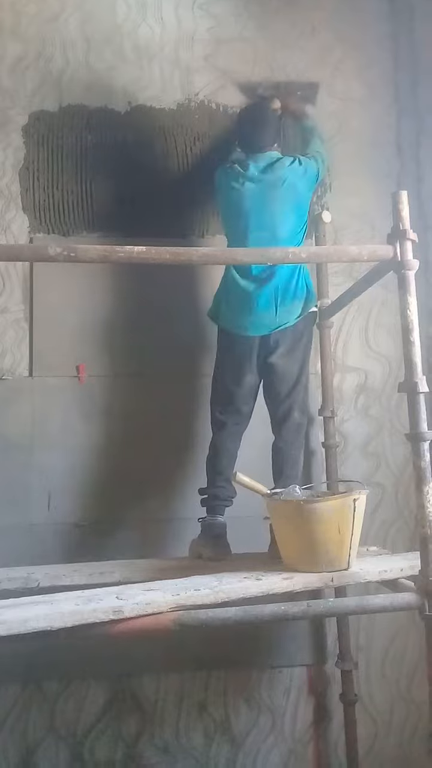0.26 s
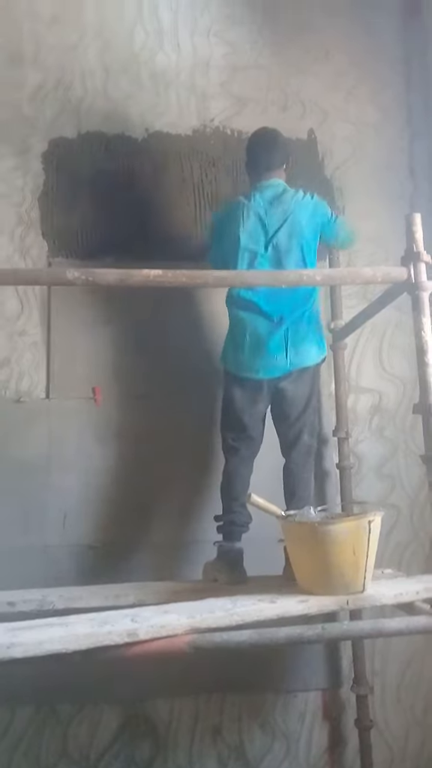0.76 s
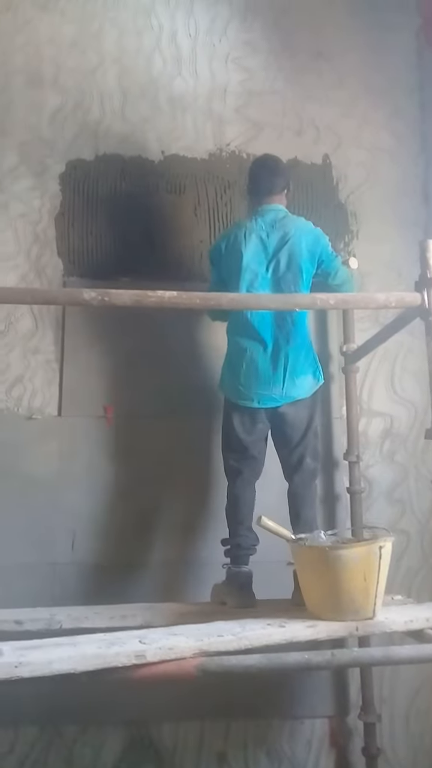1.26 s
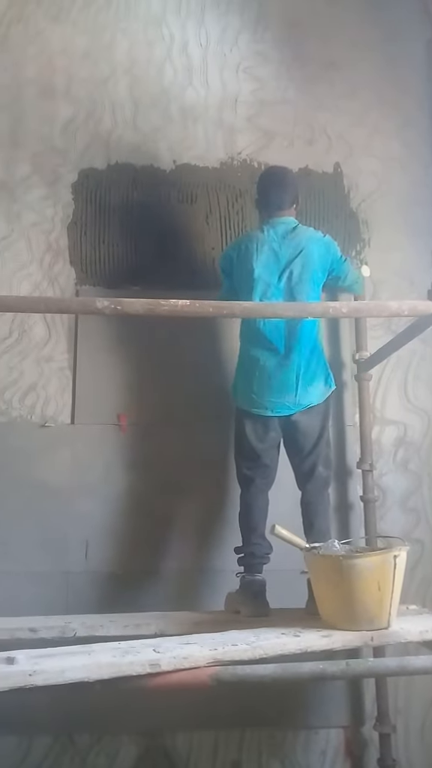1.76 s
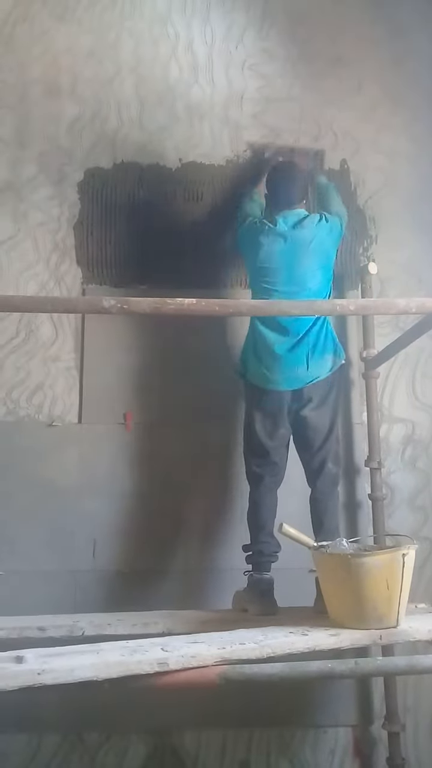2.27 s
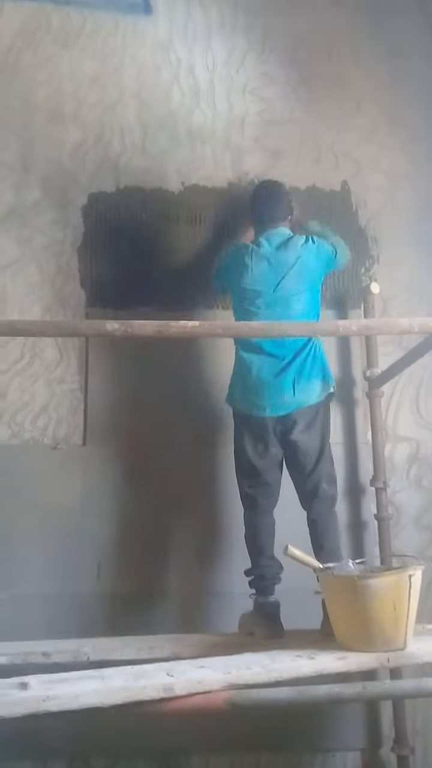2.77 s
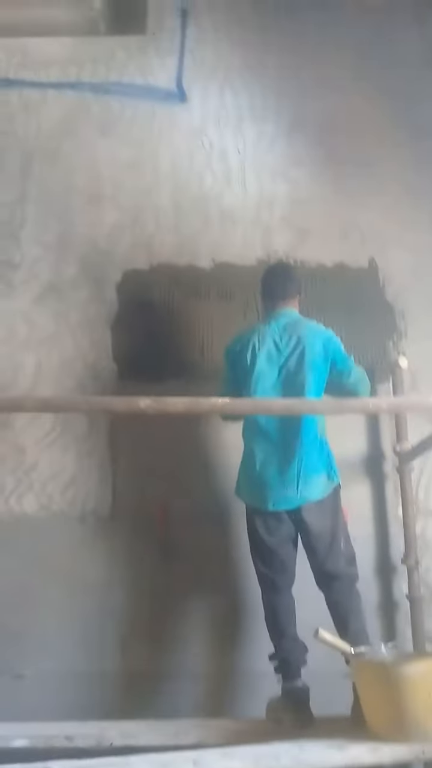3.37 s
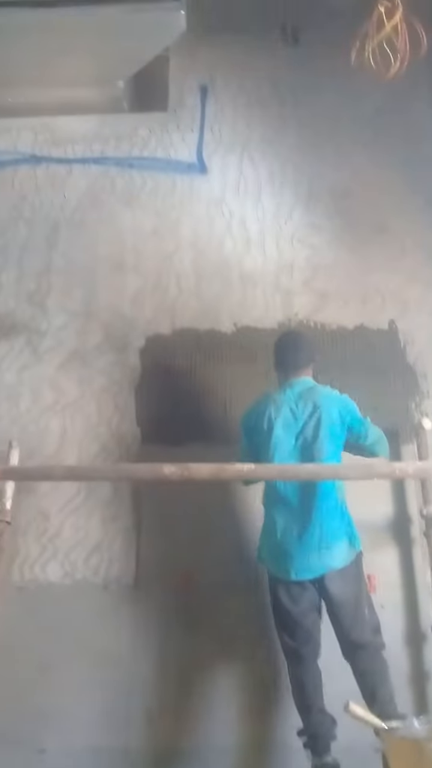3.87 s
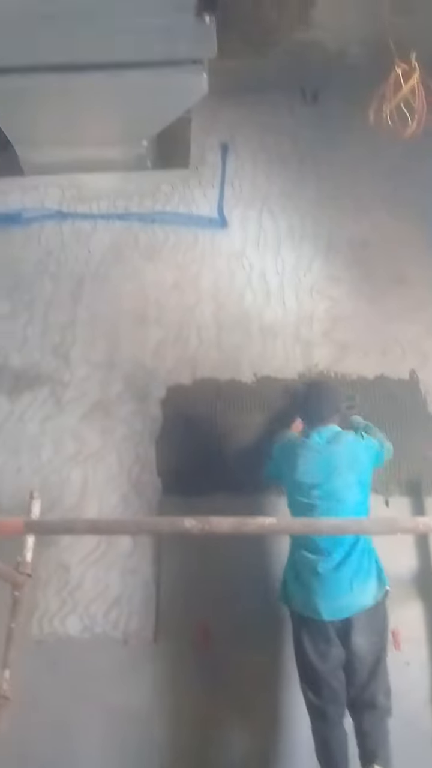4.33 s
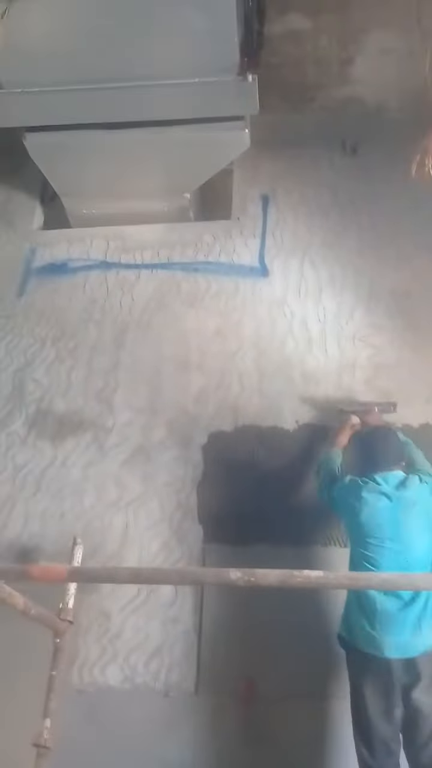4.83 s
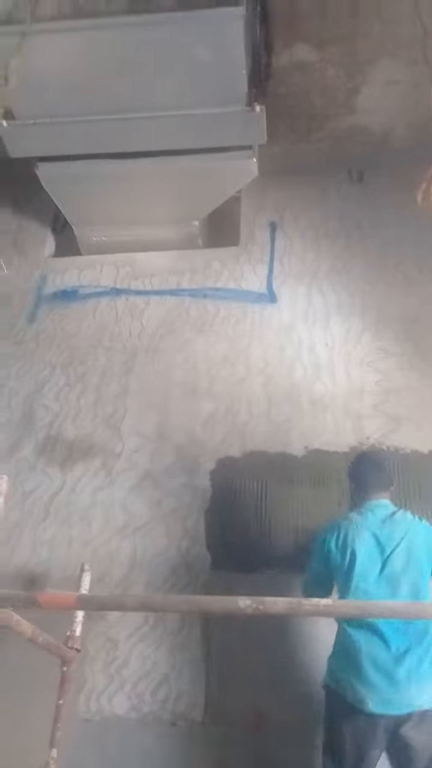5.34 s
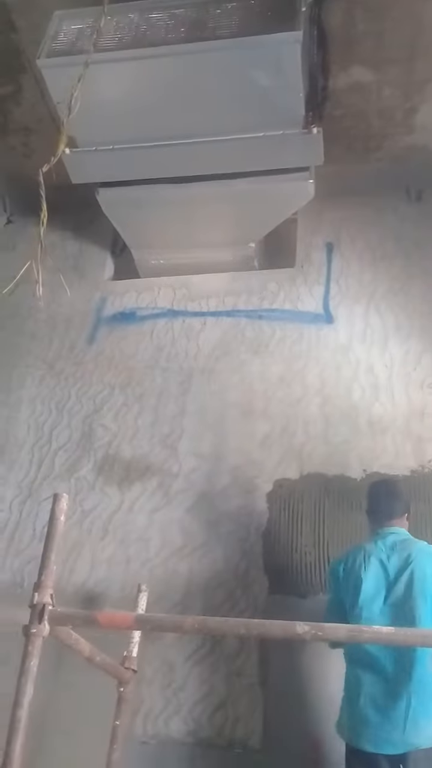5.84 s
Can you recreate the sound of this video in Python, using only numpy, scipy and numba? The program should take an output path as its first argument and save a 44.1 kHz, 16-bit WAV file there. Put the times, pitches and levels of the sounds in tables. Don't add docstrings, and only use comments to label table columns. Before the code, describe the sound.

A building site inside a bare concrete hall, heard by a phone some metres from the wall. A gritty steel scrape is already under way at the start, and stops by about 0.3 s, leaving a diffuse echo over faint motor hum, low rumble and blurred far-off machinery. At 1.45 s the blade cracks onto the wall with a short rub; from 1.65 to 2.4 s it makes a long rasping pull, sand hissing brightly over a ringing, hollow metal body. The echo fades. Around 3.7 s comes a soft dull thud with a faint rub, then an uneven, juddering pull from about 3.95 to 4.7 s, strongest near 4.1. Afterwards, distant work swells; close to the phone are a faint tick at 5.15, a sharp click at 5.4, a slight rustle and thin squeak. A light broad rub and low board shake end it near 6 s.

```python
import sys
import numpy as np
from scipy import signal
from scipy.fft import rfft, irfft
from scipy.io import wavfile
from scipy.ndimage import uniform_filter1d
from numba import njit

SR = 44100
rng = np.random.default_rng(int(sys.argv[2]) if len(sys.argv) > 2 else 0)


def wrap_up_sound(samples):
    columns = np.atleast_2d(samples).T
    tamed = np.clip(columns, -1, 1)
    steps = np.round(tamed * 32767).astype(np.int16)
    wavfile.write(sys.argv[1], SR, steps)


def volts_from_decibels(level):
    exponent = np.asarray(level, float) / 20
    return 10 ** exponent


N = 269010


def unit(x):
    return x / np.sqrt(np.mean(x ** 2))


def on_log(table, hz):
    f, v = np.transpose(table)
    return np.interp(np.log(np.maximum(hz, 1)), np.log(f), v)


def colour(x, table):
    grid_hz = np.arange(2049) * SR / 4096
    cepstrum = irfft(np.log(volts_from_decibels(on_log(table, grid_hz))))
    cepstrum[1:2048] *= 2
    cepstrum[2049:] = 0
    impulse = irfft(np.exp(rfft(cepstrum)))
    return signal.fftconvolve(x, impulse)[:len(x)]


@njit
def svf(x, hz, width):
    y, b, l = np.empty(len(x)), 0., 0.
    for i in range(len(x)):
        g, k = np.tan(np.pi * hz[i] / SR), width / hz[i]
        v = (b + g * (x[i] - l)) / (1 + g * (g + k))
        b, l, y[i] = 2 * v - b, l + 2 * g * v, k * v
    return y


def band(x, hz, width):
    return unit(svf(x, hz + np.zeros(len(x)), 1. * width))


def walk(rate, size):
    k = int(SR / rate)
    steps = np.repeat(rng.standard_normal(size // k + 1), k)
    return 1.27 * uniform_filter1d(uniform_filter1d(steps, k), k)[:size]


def fade(t, s, db):
    return volts_from_decibels(np.interp(t, s, db, left=-200, right=-200))


def spells(t, rows):
    gain = 0
    for s, rise, hold, release, db in rows:
        corners = np.cumsum([s, rise, hold, release])
        gain = gain + fade(t, corners, db - 30 * np.array([1, 0, 0, 1]))
    return gain


def grains(size, per_s, spread_db):
    chance = rng.random((3, size))
    slipping = chance[0] < per_s / SR
    direction = np.sign(chance[1] - .5)
    bulk = np.minimum(-np.log(1 - chance[2]), 4)
    return unit(slipping * direction * volts_from_decibels(spread_db * bulk))


def trowel(t):
    # (time [s], level [dB])
    strokes = [
        [(0, -41.5), (0.06, -40), (0.12, -40), (0.19, -36), (0.24, -49), (0.27, -54.5), (0.31, -65)],
        [(1.632, -61), (1.71, -43.5), (1.8, -36.5), (1.93, -33.5), (2.07, -36), (2.14, -42), (2.28, -38),
         (2.35, -37.5), (2.44, -68.5)],
        [(3.82, -69.5), (3.94, -53.5), (4.07, -35.5), (4.31, -45.5), (4.41, -38), (4.48, -41), (4.53, -50),
         (4.6, -41), (4.74, -62)],
    ]
    # (blade over grit [dB], bending resonance [dB], its pitch [Hz],
    # slack mode over grit at start [dB], at end [dB])
    grips = [
        (12, -7.5, 860, 1.5, 24),
        (12.5, -7.5, 940, 1.5, 2.5),
        (13, -9.5, 940, 4, -5.5),
    ]
    # (frequency [Hz], level per Hz [dB])
    grit_colour = [(1650, -21), (2800, -0.5), (3210, -4), (4830, -5.5), (6300, -9), (7220, -15.5),
                   (8950, -17.5), (10800, -17), (14100, -25), (15600, -24.5)]
    # (frequency [Hz], level per Hz [dB])
    blade_colour = [(320, -44), (550, -12), (626, -23.5), (763, 3), (896, 0), (1100, 0), (1290, 0.5),
                    (1740, 1), (2090, 2), (3400, -26.5), (4420, -32.5), (7480, -120)]
    # (frequency [Hz], level per Hz [dB])
    wall_colour = [(53, -58), (90, -35), (248, -3), (387, 0.5), (456, 0.5), (626, -9), (700, -0.5),
                   (910, -12.5), (1540, -120)]
    # (frequency [Hz], width [Hz], level [dB])
    rings = [(940, 52, -17), (1390, 160, -19), (1480, 41, -8), (1664, 40, -29.5), (1840, 43, -31),
             (2073, 22, -9), (2567, 180, 3.5), (2785, 93, -8)]
    size = len(t)

    slips = grains(size, per_s=9000, spread_db=1.5) * volts_from_decibels(2.0 * walk(35, size))
    judder = grains(size, per_s=1500, spread_db=3.5) * volts_from_decibels(2.8 * walk(60, size))
    push = slips + 0.85 * judder

    ends = [row[0] for stroke in strokes for row in (stroke[0], stroke[-1])]
    blade_db, bend_db, bend_hz = (np.interp(t, ends, np.repeat(c, 2)) for c in np.transpose(grips)[:3])
    slack_db = np.interp(t, ends, np.array(grips)[:, 3:].ravel())

    light_db = np.interp(t, *np.concatenate(strokes).T) + 40
    wobble_db = 0.3
    wobble = [walk(14, size) for _ in range(4)]
    blade_db = blade_db - 0.15 * light_db + wobble_db * wobble[0]
    wall_db = -4.5 - 0.2 * light_db + wobble_db * wobble[1]
    slack_db = slack_db + wobble_db * wobble[2]
    bend_hz = bend_hz * (1 + 0.036 * wobble[3])

    ringing = 0
    for hz, width, db in rings:
        ringing = ringing + volts_from_decibels(db) * band(push, hz * (1 + 0.023 * walk(6, size)), width)
    bending = volts_from_decibels(bend_db) * band(push, bend_hz, 130)
    blade = unit(unit(colour(push, blade_colour)) + bending + volts_from_decibels(-15.5) * ringing)
    wall = unit(colour(judder, wall_colour))
    slack = band(band(push, 720, 240), 720, 240)
    hiss = unit(colour(slips, grit_colour))

    body = volts_from_decibels(blade_db) * blade + volts_from_decibels(wall_db) * wall + volts_from_decibels(slack_db - 9.0) * slack
    effort = sum(fade(np.maximum(t, 0), *np.transpose(stroke)) for stroke in strokes)
    return effort * (volts_from_decibels(4.0) * hiss + body)


def touches(t):
    # (time [s], peak level [dB], t60 [s])
    cracks = [
        (1.46, -16, .05),
        (1.647, -22.5, 0.26),
    ]
    # (start [s], rise [s], hold [s], release [s], level [dB])
    presses = [
        (1.454, 0.019, 0.025, 0.18, -36.5),
        (3.704, 0.024, 0.074, .3, -54.5),
        (5.693, .3, .04, 0.23, -39),
    ]
    # (start [s], rise [s], hold [s], release [s], level [dB])
    hisses = [
        (1.442, 0.022, .02, 0.22, -52.5),
        (3.594, 0.26, .03, 0.039, -54.5),
        (5.654, 0.19, 0.21, .3, -55.5),
    ]
    # (frequency [Hz], level per Hz [dB])
    body_colours = [
        [(180, -49), (300, -18.5), (418, -7), (453, -17), (593, -11), (637, -13), (733, -9), (1450, -3.5),
         (3300, -20.5), (4290, -54.5), (7260, -120)],
        [(120, -27), (200, 7), (236, 4.5), (493, -16), (952, -21), (1310, -32), (1970, -10), (3300, -31),
         (4290, -64), (7260, -120)],
        [(59, -38), (100, -4), (185, -9), (290, -10), (369, -1.5), (587, -6.5), (671, -8.5), (2200, -12.5),
         (3200, -20.5), (4680, -25), (7920, -120)],
    ]
    # (frequency [Hz], level per Hz [dB])
    hiss_colours = [
        [(1940, -33.5), (3300, 1), (3710, -1), (5730, 4), (8510, -14), (10700, -4), (12600, -10), (15600, -24)],
        [(1940, -39), (3300, -9), (4870, -2), (6730, -8), (8960, -19), (12000, -19), (15600, -50),
         (22000, -120)],
        [(1940, -34), (3300, -11), (4390, -3), (5230, 0.5), (7050, -7.5), (8190, -12.5), (11000, -14.5),
         (12900, -21), (15600, -33.5)],
    ]
    # (start [s], rise [s], hold [s], release [s], level [dB])
    thud = [
        (3.702, .008, .045, .08, -42),
    ]

    crack_gain = np.zeros(len(t))
    for s, db, t60 in cracks:
        crack_gain += (t >= s + .002) * volts_from_decibels(db - 8.0 - 60 * np.maximum(t - s, 0) / t60)
    noise = rng.standard_normal(len(t))
    edge = band(band(noise, 5500, 2500), 4800, 2500)
    out = crack_gain * (unit(colour(noise, body_colours[0])) + volts_from_decibels(-19.5) * edge)

    rub = grains(len(t), per_s=5400, spread_db=4.0) * volts_from_decibels(1.4 * walk(50, len(t)))
    teeth = rub[::-1]
    for press, hiss, body_colour, hiss_colour in zip(presses, hisses, body_colours, hiss_colours):
        out += spells(t, [press]) * unit(colour(rub, body_colour))
        out += spells(t, [hiss]) * unit(colour(teeth, hiss_colour))
    return out + spells(t, thud) * band(band(rub, 410, 350), 410, 350)


def tail():
    # (frequency [Hz], t60 [s])
    decay_times = [(200, 1.6), (500, 1.16), (1000, 1.195), (2200, 0.9), (4500, 0.77), (6400, 0.62),
                   (9000, 0.44), (12000, .33), (15500, 0.31)]
    delay_s = 0.0078
    age, out = np.arange(2 * SR) / SR, 0
    noise = rfft(rng.standard_normal(2 * SR))
    step = 2 * np.log2(np.maximum(np.arange(SR + 1) / 2, 1) / 70)
    for k in range(17):
        t60 = on_log(decay_times, 70 * 2 ** (k / 2))
        strip = irfft(noise * np.maximum(1 - abs(step - k), 0))
        out = out + strip * volts_from_decibels(-60 * age / t60) / np.sqrt(t60)
    out = out * np.minimum(age / delay_s, 1) ** 2
    return out / np.sqrt(np.sum(out ** 2))


def hall(x):
    turn = 2 * np.pi * 11 * np.arange(len(x)) / SR
    shares = np.cos(turn) * np.cos(0.366 * turn), np.sin(turn) * np.cos(0.3763 * turn), np.sin(0.3708 * turn)
    echoes = sum(signal.fftconvolve(x * share, tail())[:len(x)] for share in shares)
    return x + volts_from_decibels(2.5) * echoes


def nearby(t):
    # (time [s], peak level [dB], centre [Hz], width [Hz], t60 [s])
    ticks = [
        (5.16, -68, 7760, 3500, .03),
        (5.384, -52, 12370, 8000, 0.015),
        (5.39, -61, 12600, 13030, 0.38),
    ]
    # (start [s], rise [s], hold [s], release [s], level [dB])
    rustle = [
        (5.238, 0.061, 0.053, 0.84, -65),
    ]
    # (start [s], rise [s], hold [s], release [s], level [dB])
    low_rubs = [
        (5.24, .16, .02, .5, -61),
        (5.62, 0.14, 0.069, .1, -61.5),
    ]
    # (start [s], rise [s], hold [s], release [s], level [dB])
    squeak = [
        (5.3, .11, .04, .2, -70),
    ]

    out = 0
    for s, db, hz, width, t60 in ticks:
        crack = band(band(rng.standard_normal(N), hz, width), hz, width)
        out = out + (t >= s) * volts_from_decibels(db - 60 * np.maximum(t - s, 0) / t60) * crack
    rub = grains(N, per_s=7200, spread_db=-3.0)
    out = out + spells(t, rustle) * band(band(band(rub, 4800, 3000), 4300, 2700), 5500, 2600)
    out = out + spells(t, low_rubs) * band(band(rub, 2030, 600), 2030, 600)
    return out + spells(t, squeak) * band(rub, 3940 * (1 + .015 * walk(30, N)), 170)


def swell(t, db, rows):
    return np.hypot(volts_from_decibels(db), spells(t, rows))


def motor(t):
    # (start [s], rise [s], hold [s], release [s], level [dB])
    loads = [
        (.3, .5, 0.54, .6, -58.5),
        (3.6, 0.34, .05, .4, -59),
        (4.5, 0.49, .6, .6, -64),
    ]
    hum = band(np.sin(2 * np.pi * 86.1 * t) + 12 * rng.standard_normal(N), 86.1, 12)
    return hum * swell(t, -64.5, loads)


def rumble(t):
    # (frequency [Hz], level per Hz [dB])
    rumble_colour = [(15, -48), (25, 4.5), (76, -11), (134, -0.5), (170, -4), (244, -5), (330, -17.5),
                     (557, -13), (900, -22), (1170, -50.5), (1980, -120)]
    # (start [s], rise [s], hold [s], release [s], level [dB])
    boards = [
        (-.5, 0.34, .4, .6, -58),
        (1.012, .5, 1.0, 0.7, -52.5),
        (3.594, 0.32, 0.75, .6, -50.5),
        (5.749, 0.35, .01, .15, -44),
    ]
    low = unit(colour(rng.standard_normal(N), rumble_colour)) * volts_from_decibels(-1.5 + 0.41 * walk(6, N))
    return low * swell(t, -55, boards)


def far_work(t):
    # (frequency [Hz], level per Hz [dB])
    machine_colour = [(180, -32), (300, -2.5), (327, -3.5), (518, -3), (638, -2), (1090, -7.5), (1200, -21),
                      (1560, -33), (2640, -120)]
    # (start [s], rise [s], hold [s], release [s], level [dB])
    machines = [
        (.4, 0.24, 0.4, 0.73, -56.5),
        (2.201, .4, 0.88, 0.97, -61.5),
        (4.4, 0.27, .15, 0.36, -52),
        (4.995, 0.32, 0.86, .3, -58.5),
    ]
    # (frequency [Hz], level per Hz [dB])
    scrape_colour = [(650, -28.5), (1100, -13), (1180, -7.5), (1400, -10.5), (1430, -8.5), (1720, -10.5),
                     (2370, -11), (3200, -25), (7000, -35), (9100, -70), (15400, -120)]
    # (start [s], rise [s], hold [s], release [s], level [dB])
    scrapes = [
        (.2, 0.29, 0.3, 0.76, -58.5),
        (2.0, 0.44, 0.64, 0.65, -61.5),
        (4.6, 0.6, 0.11, 0.9, -58.5),
        (5.7, 0.16, .05, 0.52, -52.5),
    ]
    machinery = unit(colour(rng.standard_normal(N), machine_colour)) * volts_from_decibels(1.5 * walk(13, N))
    scraping = unit(colour(rng.standard_normal(N), scrape_colour)) * volts_from_decibels(walk(9.2, N))
    return machinery * swell(t, -68.5, machines) + scraping * swell(t, -72, scrapes)


def phone_hiss():
    # (frequency [Hz], level per Hz [dB])
    hiss_colour = [(300, 2), (4000, -3.5), (9000, -5.5), (16000, -1)]
    return volts_from_decibels(-75.5) * unit(colour(rng.standard_normal(N), hiss_colour))


def scene():
    lead = SR
    early = np.arange(-lead, N) / SR
    t = early[lead:]
    work = hall(trowel(early) + volts_from_decibels(-6.0) * touches(early))[lead:]
    site = motor(t) + rumble(t) + far_work(t) + phone_hiss()
    return np.tile(work + nearby(t) + site, (2, 1))


def side_noise(t):
    # (time [s], low edge [Hz], high edge [Hz], level [dB])
    fills = [(1.745, 5500, 7000, -44), (1.93, 5500, 7000, -39), (1.93, 8800, 10400, -46),
             (2.21, 6100, 7600, -44), (2.21, 13700, 15700, -55), (4.485, 5500, 7000, -42),
             (4.605, 9600, 11100, -52), (4.605, 12300, 14500, -55)]
    side = volts_from_decibels(-82) * rng.standard_normal(N)
    hz, noise = np.arange(SR + 1) / 2, rfft(rng.standard_normal(2 * SR))
    for s, low_hz, high_hz, db in fills:
        fill = np.resize(unit(irfft(noise * (hz > low_hz) * (hz < high_hz))), N)
        window = np.cos(np.pi / 2 * np.clip((t - s) / .018, -1, 1)) ** 2
        side = side + volts_from_decibels(db) * fill * window
    return side


def roll_off(x):
    return signal.sosfilt(signal.butter(12, 15710, fs=SR, output="sos"), x)


def record(dry):
    rounded = .8 * np.tanh(dry[0] / .8)
    bass_cut = signal.butter(6, 38, "high", fs=SR, output="sos")
    mid = signal.sosfilt(bass_cut, rounded)
    side = side_noise(np.arange(N) / SR)
    return roll_off(np.array([mid + side, mid - side]))


dry = scene()
out = record(dry)
wrap_up_sound(out)
```